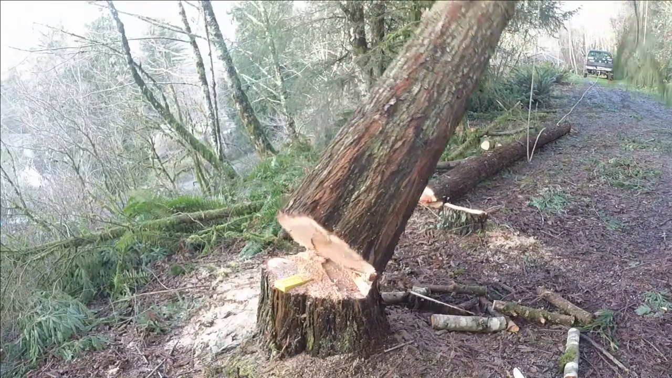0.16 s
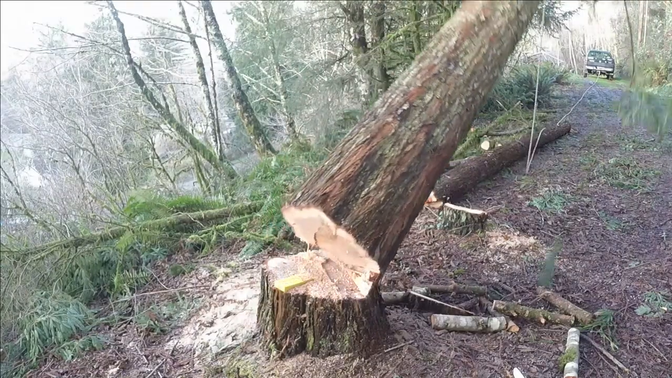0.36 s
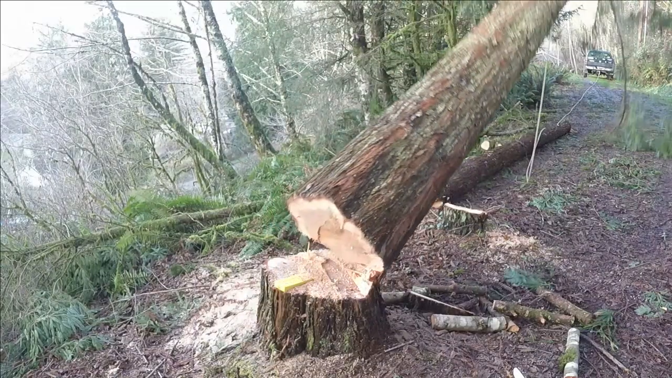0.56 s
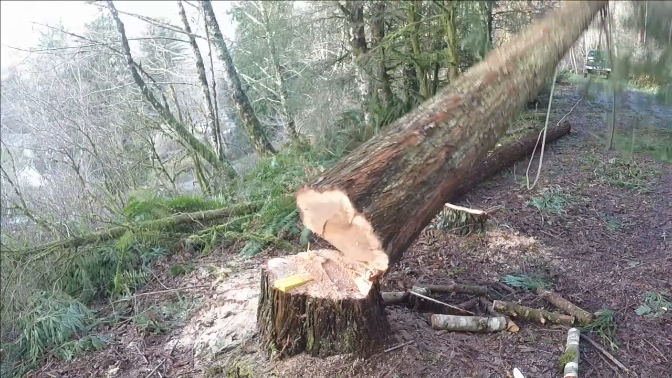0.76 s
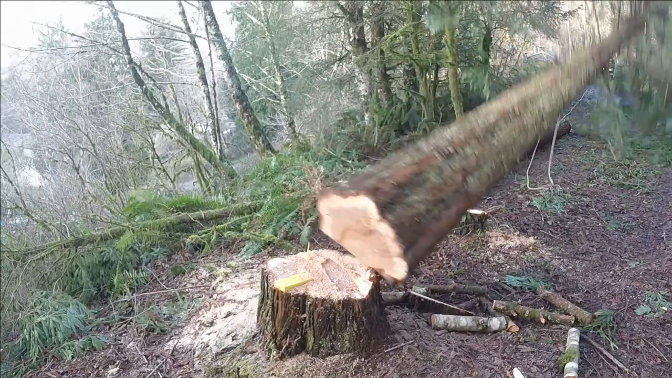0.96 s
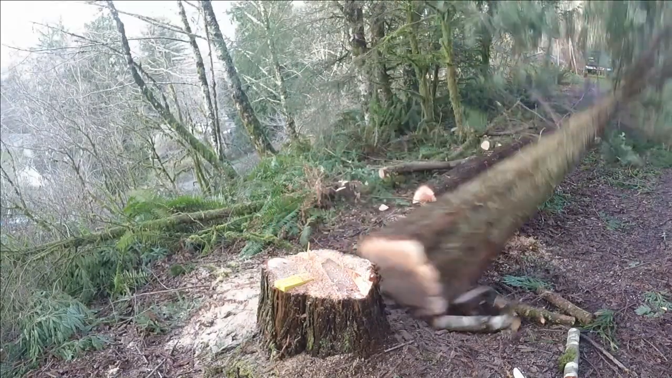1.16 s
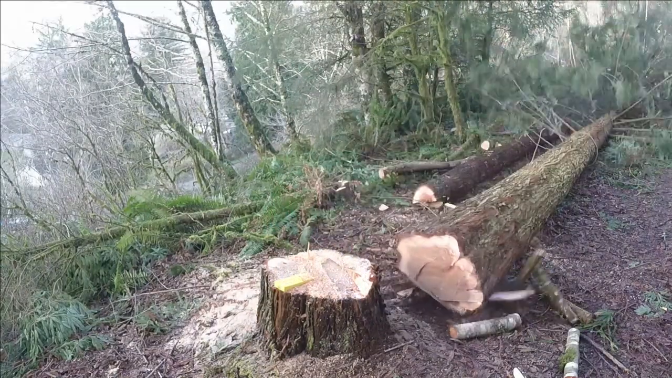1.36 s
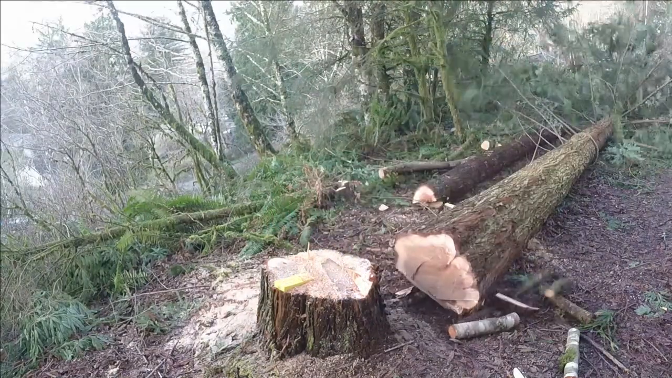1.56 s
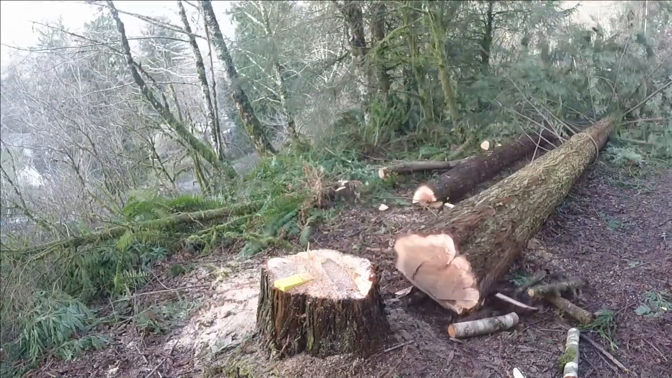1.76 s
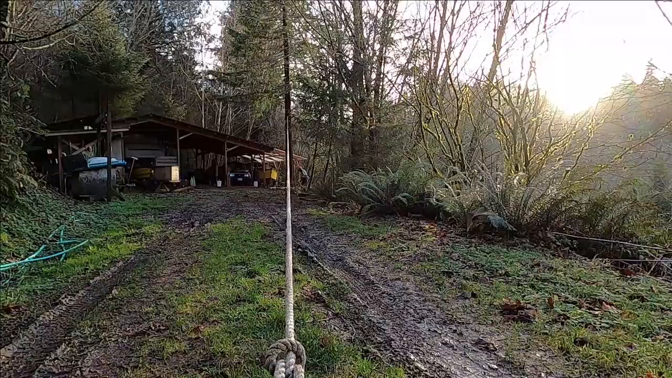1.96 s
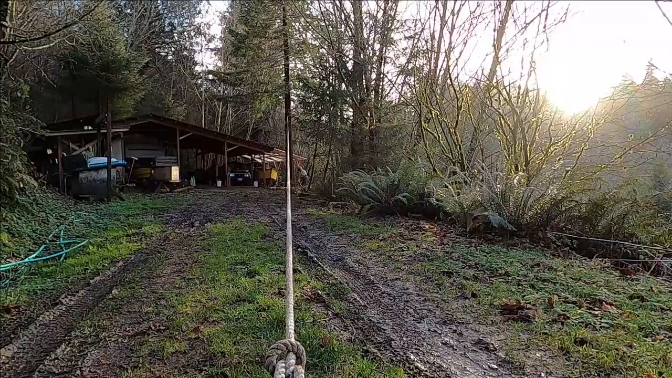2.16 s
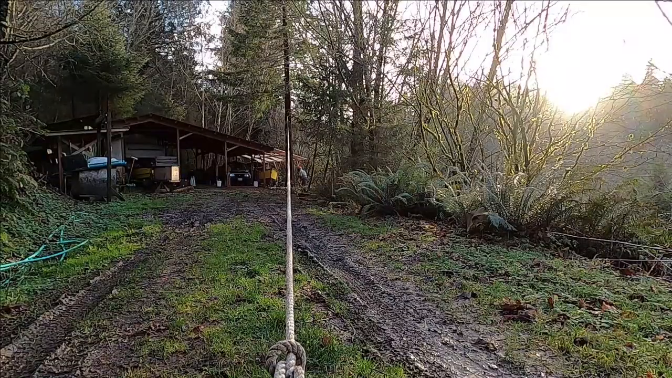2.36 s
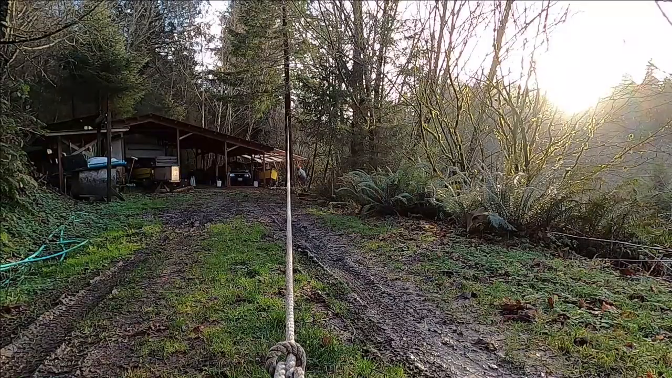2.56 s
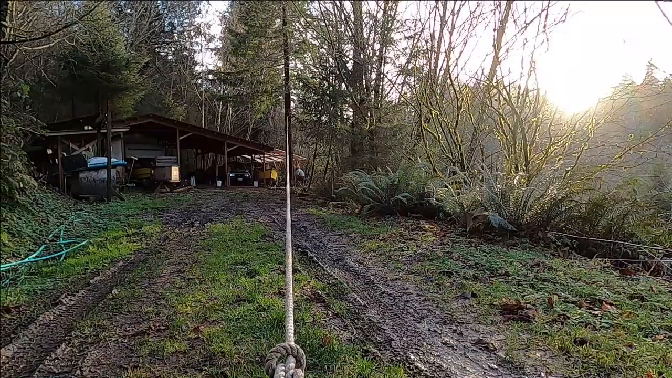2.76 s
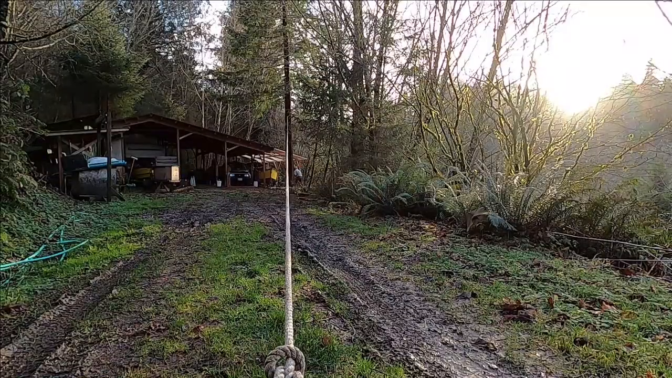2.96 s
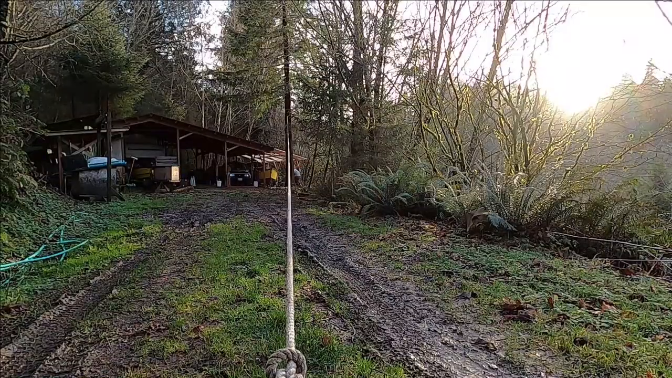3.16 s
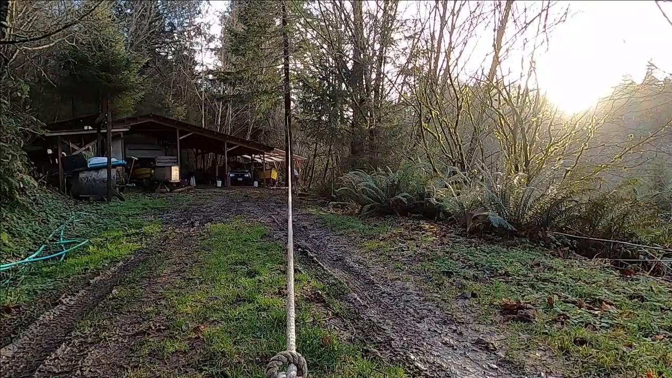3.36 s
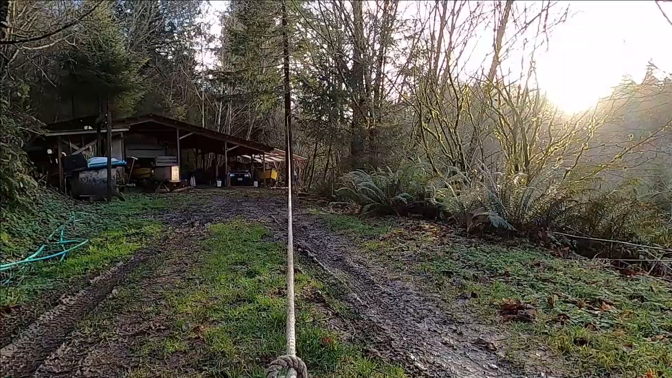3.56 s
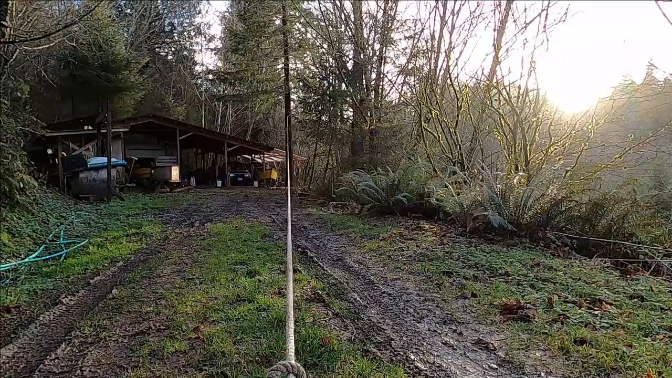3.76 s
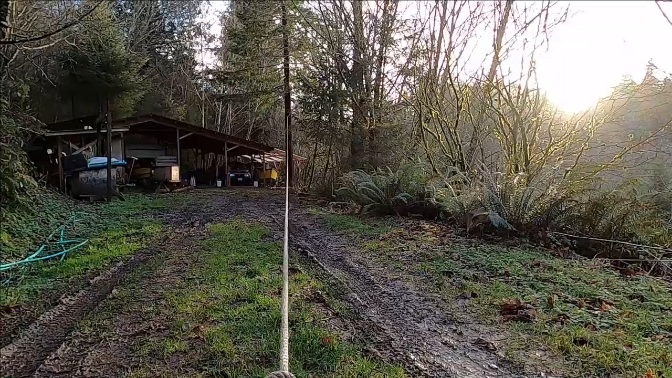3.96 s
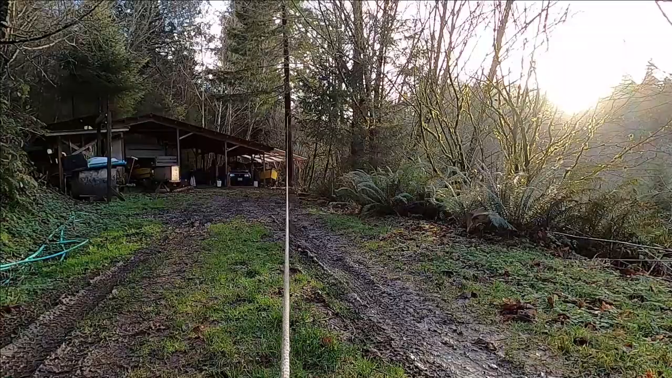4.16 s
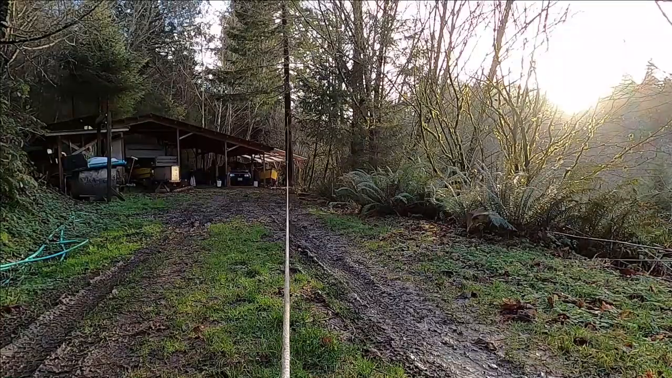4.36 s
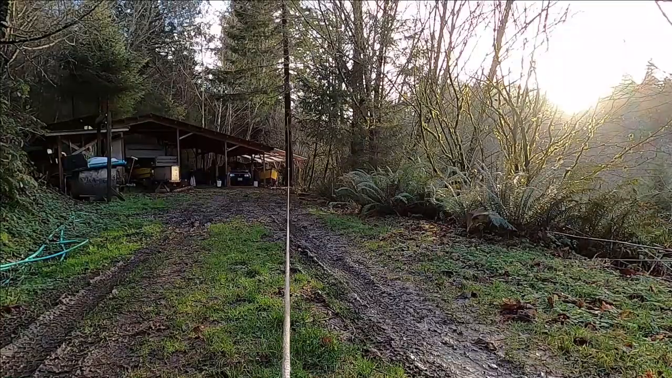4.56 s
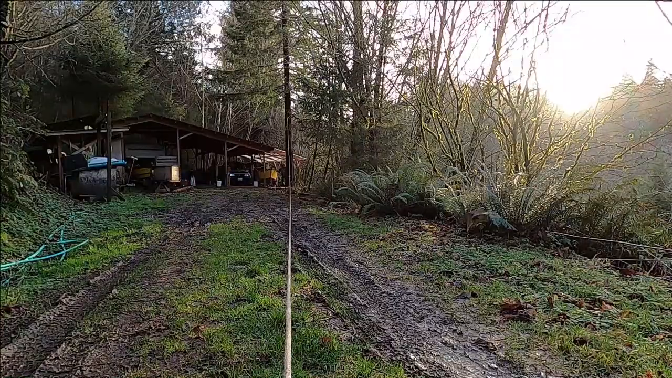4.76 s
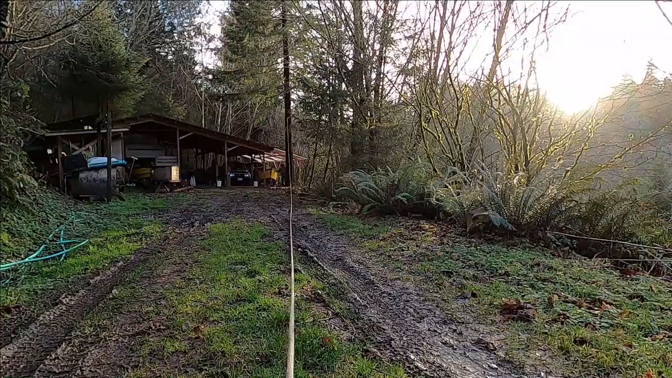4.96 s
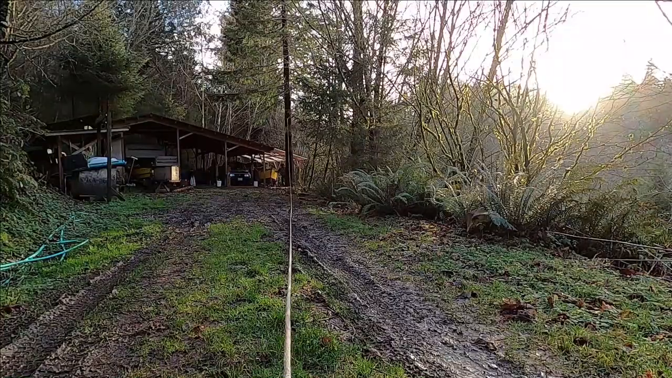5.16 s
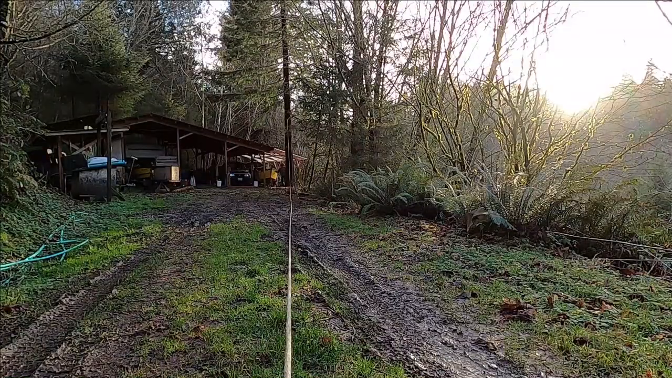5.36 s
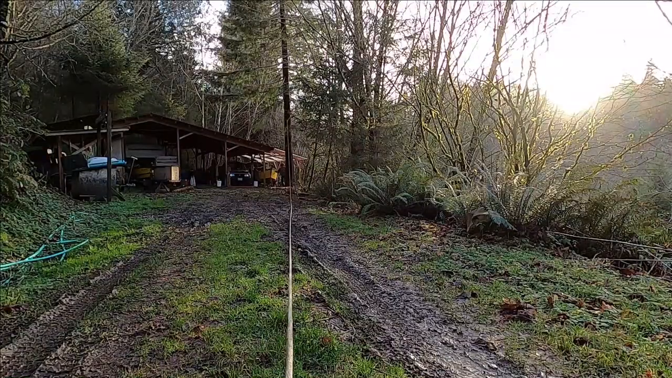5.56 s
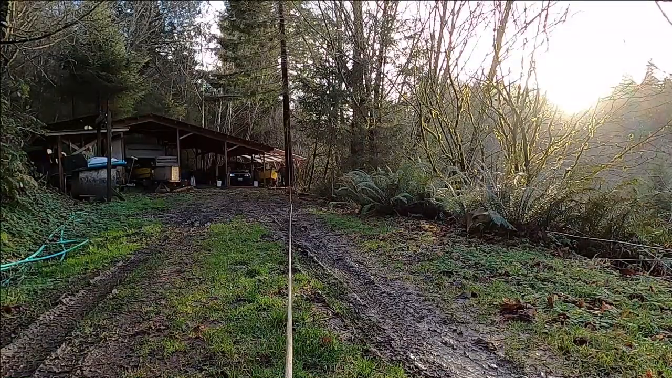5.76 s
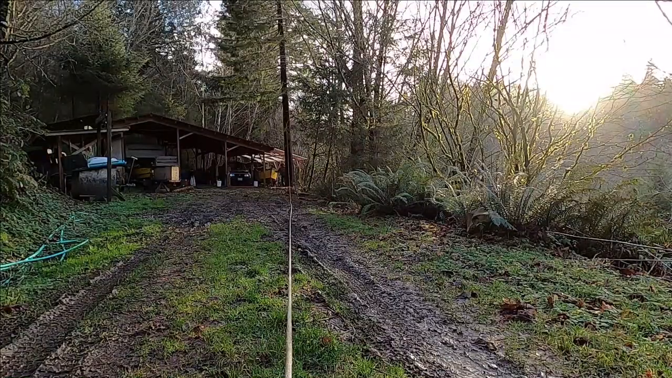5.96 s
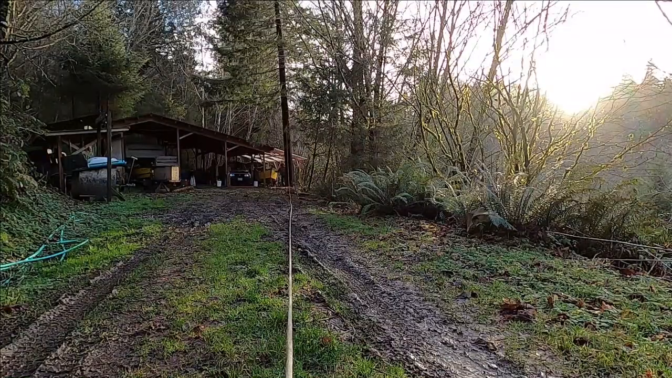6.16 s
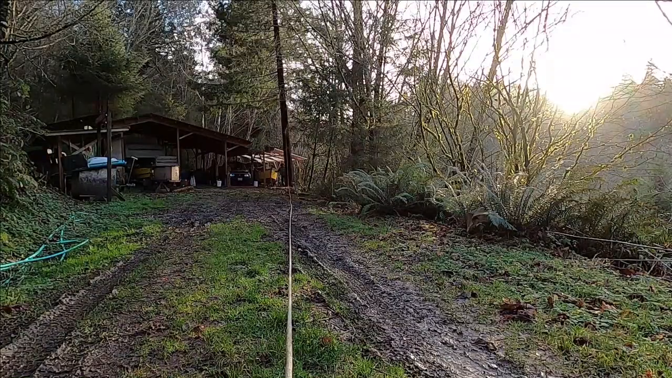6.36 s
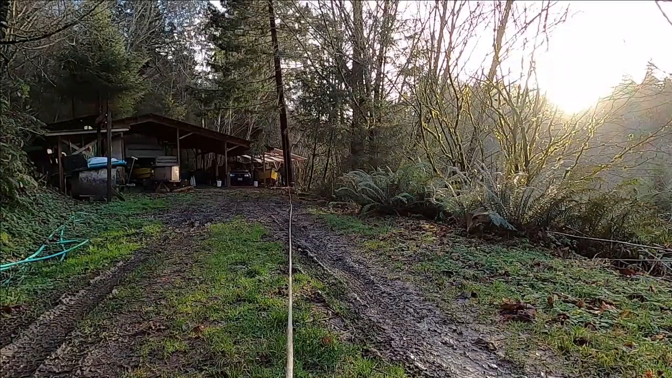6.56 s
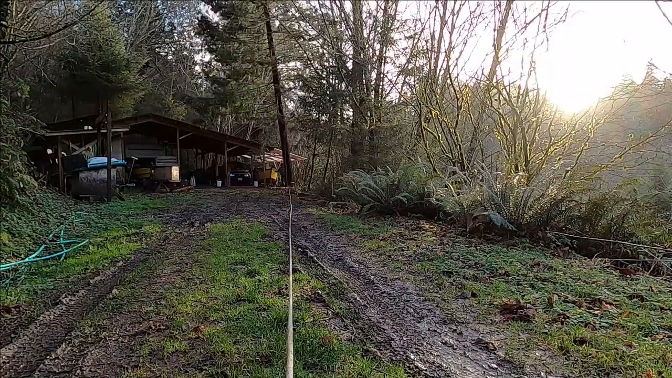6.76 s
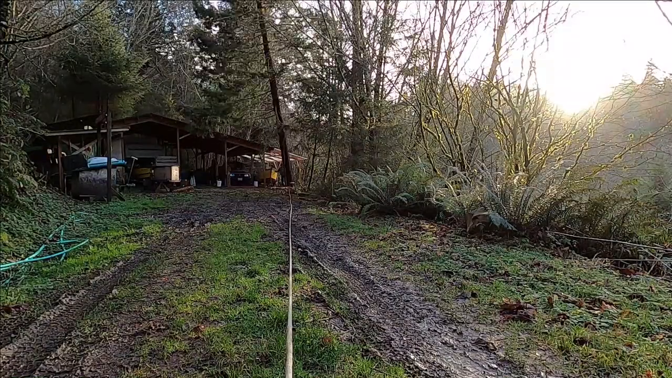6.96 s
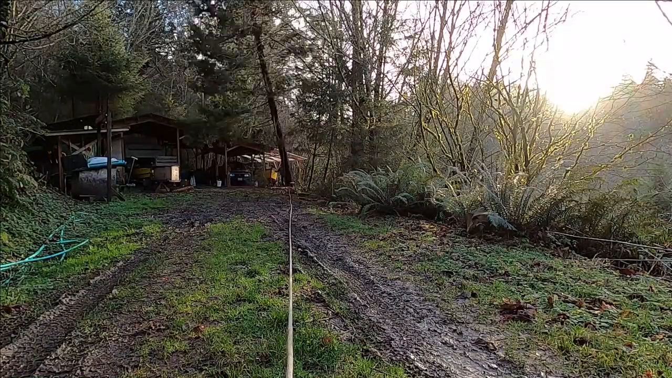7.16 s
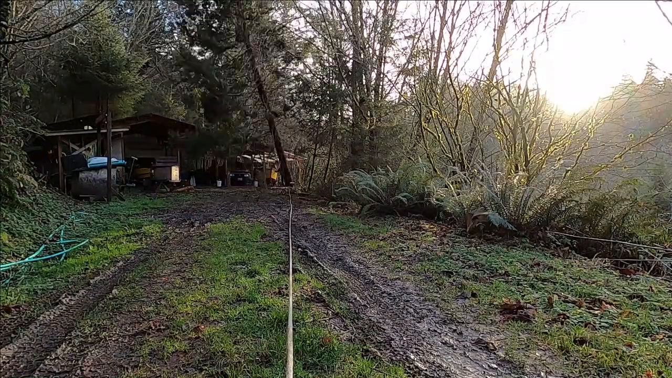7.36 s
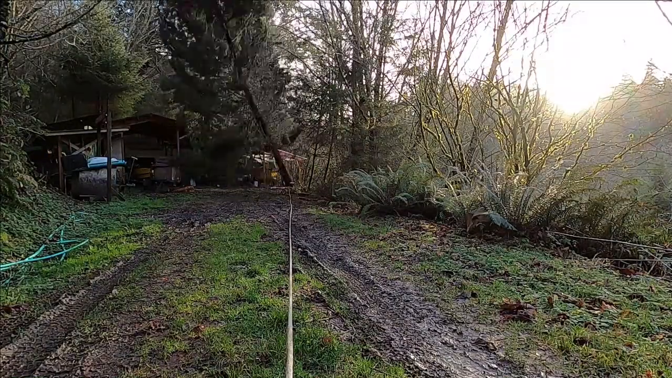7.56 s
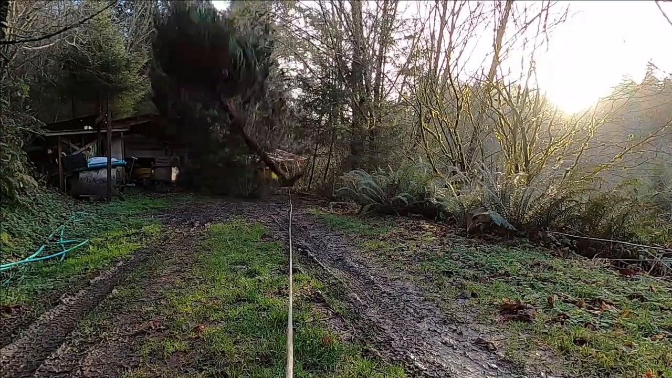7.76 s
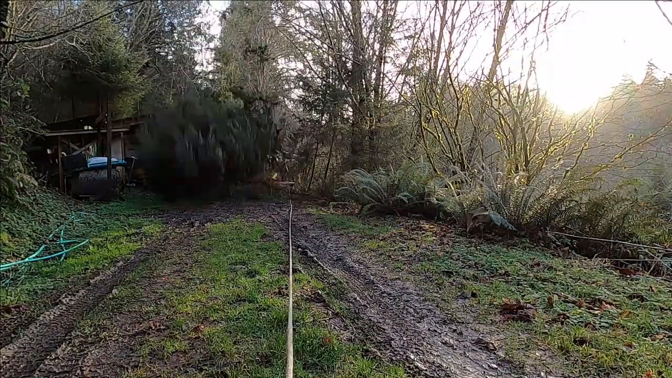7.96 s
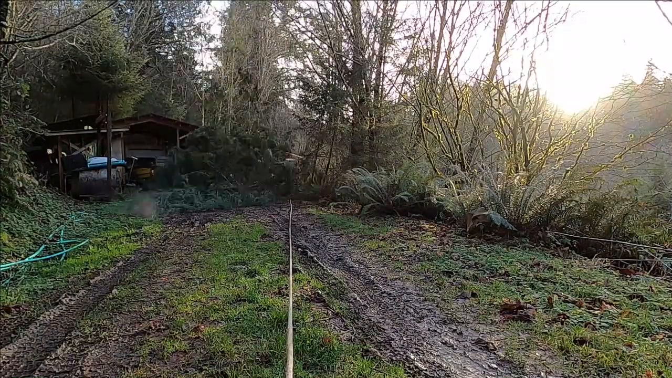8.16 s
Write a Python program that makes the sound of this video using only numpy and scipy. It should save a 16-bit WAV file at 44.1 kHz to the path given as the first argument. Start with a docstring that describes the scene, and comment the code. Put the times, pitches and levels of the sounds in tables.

```python
"""Two trees felled in woodland

Close by, the hinge of a wedged tree tears and snaps and the trunk crashes down: random fibre clicks excite
wood colours and resonances. After an abrupt change of place an engine idles as harmonic lines and a rope pulls
a more distant tree with dull damped bumps. Its hinge cracks ever faster in short avalanches and creaks by
stick-slip, and the crown sweeps through branches to the ground as swelling coloured clicks and noise."""
import sys
import numpy as np
from scipy import signal
from scipy.fft import rfft, irfft
from scipy.io import wavfile
from scipy.ndimage import uniform_filter1d, minimum_filter1d

SR = 44100
rng = np.random.default_rng(int(sys.argv[2]) if len(sys.argv) > 2 else 0)


def wrap_up_sound(samples):
    """Save the sound to the file named by the first command line argument, as 16-bit audio."""
    columns = np.atleast_2d(samples).T
    # keep every value between -1 and 1, then stretch to whole-number steps
    tamed = np.clip(columns, -1, 1)
    steps = np.round(tamed * 32767).astype(np.int16)
    wavfile.write(sys.argv[1], SR, steps)


N = 362061
T = np.arange(N) / SR
# levels in the tables are relative: later stages scale them


def amp(db):
    """Decibels are a logarithmic measure: convert them to linear gain."""
    return 10 ** (np.asarray(db) / 20)


def unit(x):
    """Normalise the mean power, so that the rms is 1."""
    return x / np.sqrt(np.mean(x ** 2) + 1e-20)


def curves(rows):
    """Linear interpolation: each column of a table of (time_s, ..) as a value per sample."""
    times, *columns = np.transpose(rows)
    return [np.interp(T, times, column) for column in columns]


def colour(x, points):
    """Minimum-phase filtering: a causal response with the spectrum (frequency_hz, level_db)."""
    size = 4096
    hz, db = np.transpose(points)
    bin_hz = np.arange(size // 2 + 1) * SR / size
    log_gain = np.log(amp(np.interp(np.log(bin_hz + 1), np.log(hz), db)))
    # folding the cepstrum onto positive times makes the response causal
    cepstrum = irfft(log_gain)[:size // 2]
    cepstrum[1:] *= 2
    response = irfft(np.exp(rfft(cepstrum, size)))
    return signal.fftconvolve(x, response)[:len(x)]


def ring(x, modes):
    """Modal superposition: sum of resonances (frequency_hz, width_hz, level_db)."""
    out = 0
    for hz, width, db in modes:
        b, a = signal.iirpeak(hz, hz / width, fs=SR)
        out = out + amp(db) * signal.lfilter(b, a, x)
    return out


def add(track, s, sound):
    """Superposition: lay a sound into a track at time s."""
    i = max(int(s * SR), 0)
    track[i:i + len(sound)] += sound[:N - i]


def walk(rate):
    """Smoothed random steps, rate per second: a wander with rms 1."""
    k = int(SR / rate)
    steps = np.repeat(rng.standard_normal(N // k + 1), k)
    return unit(uniform_filter1d(steps, k)[:N])


def swell(s, rise, fall_db_per_s):
    """Exponential growth to 1 at time s, then exponential decay."""
    return np.exp(np.minimum(T - s, 0) / rise) * amp(-fall_db_per_s * np.maximum(T - s, 0))


def swells(rows):
    """Power addition of the swells (peak_s, rise_s, fall_db_per_s, level_db, ..): one envelope per level."""
    return np.sqrt(sum(np.outer(amp(dbs), swell(s, rise, fall)) ** 2 for s, rise, fall, *dbs in rows))


def fibres(rate, spread_db, count=N):
    """Random fracture: clicks of breaking fibres, many small and a few large."""
    chance = rng.random(count)
    sign = rng.choice([-1, 1], count)
    size = rng.exponential(size=count)
    return (chance < rate / SR) * sign * amp(spread_db * np.minimum(size, 4))


def fracture(length, rate, spread_db, count=12000):
    """Avalanche: one fibre gives way and sets off a dying run of others."""
    clicks = unit(fibres(rate, spread_db, count=count))
    clicks[0] += 3
    return clicks * np.exp(-np.arange(count) / SR / length)


def burst_level(x, db, length):
    """Energy scaling: a burst gets the energy of a steady sound of level db lasting its length."""
    return x * amp(db) * np.sqrt(length * SR / np.sum(x ** 2))


def knocks(rows, rise):
    """Damped oscillation (start_s, level_db, pitch_hz, decay_s) that builds up over rise cycles."""
    out, t = np.zeros(N), T[:SR]
    for s, db, hz, decay in rows:
        swing = np.sin(2 * np.pi * hz * t) * np.exp(-t / decay)
        add(out, s, amp(db) * swing * (1 - np.exp(-t * hz / rise)))
    return out


def woods(x, t60, dull_hz, early_db, early_s):
    """Diffuse scattering from the ground and brush nearby, then from ever more distant trunks."""
    t = T[:SR]
    far, near = rng.standard_normal((2, SR))
    late = far * amp(-60 * t / t60) * (1 - np.exp(-t / 0.0086))
    early = near * np.exp(-t / early_s)
    b, a = signal.butter(1, dull_hz, fs=SR)
    echoes = signal.lfilter(b, a, unit(late) + amp(early_db) * unit(early))
    # echoes return in ragged clumps
    return signal.fftconvolve(x, echoes)[:N] / np.sqrt(SR) * amp(2.5 * walk(300) - 1)


HINGE_PARTS_S, HINGE_RELEASE_DB_PER_S = 1, 200


def hinge_hold():
    """Release of tension: steady tearing until the hinge parts, then the loose fibres fall quiet."""
    return amp(-HINGE_RELEASE_DB_PER_S * np.maximum(T - HINGE_PARTS_S, 0))


# a bundle of fibres goes at once: peak_s, rise_s, fall_db_per_s, wood_body_db, fibres_db
HINGE_RIPS = [(0.026, 0.065, 200, -15.5, -21.5), (0.1, .015, 119, -28, -25.5), (0.37, 0.018, 120, -24, -31),
              (0.446, 0.011, 67, -16.5, -22.5), (0.65, 0.049, 48, -22, -30), (0.94, 0.058, 46, -23, -27.5)]
# the butt breaks free, trunk and limbs hit the ground, debris settles:
# peak_s, rise_s, fall_db_per_s, wood_body_db, splinters_db
GROUND_CRASHES = [(1.0, 0.0054, 192, -19, -15), (1.17, 0.044, 90, -17, -16.5),
                  (1.23, 0.038, 198, -27, -12.5), (1.29, .02, 73, -19, -43),
                  (1.35, 0.08, 102, -16.5, -13.5), (1.39, 0.019, 176, -15, -17.5), (1.5, .1, 5, -45, -40.5),
                  (1.698, 0.0087, 115, -34, -47)]
# spectrum of the ringing wood: frequency_hz, density_db (per Hz)
BODY_SPECTRUM = [(30, -16), (100, -4.5), (180, 0.5), (270, -0.5), (450, -0.5), (620, -1), (830, 1),
                 (1050, -0.5), (1300, -18), (1700, -37), (4000, -49)]


def wood_body():
    """Forced vibration: tearing fibres and the crash ring the body of the wood."""
    rips, crashes = swells(HINGE_RIPS)[0], swells(GROUND_CRASHES)[0]
    steady = amp(-29) * hinge_hold()
    level = np.hypot(np.hypot(steady, rips), crashes)
    body = unit(colour(fibres(1100, 3.5), BODY_SPECTRUM))
    return body * level * amp(-4.5 + 0.9 * walk(45.04))


# spectrum of tearing hinge fibres: frequency_hz, density_db (per Hz)
TEARING_SPECTRUM = [(300, -29), (1100, 1), (1550, 0), (2100, 0.5), (3300, -1), (4200, -5), (5600, -2),
                    (7000, -6), (8500, -12.5), (11000, -19), (15000, -35)]
# spectrum of splintering wood: frequency_hz, density_db (per Hz)
SPLINTER_SPECTRUM = [(300, -25.5), (1100, -1.5), (1550, -4), (2100, 2), (2700, -1), (3500, 0), (4300, -5),
                     (5400, -2), (7000, -11), (8500, -15.5), (11000, -25.5), (15000, -43)]


def tearing_and_splinters():
    """Shot noise: hinge fibres hiss until the hinge parts, after that limbs splinter on the ground."""
    rips, crashes = swells(HINGE_RIPS)[1], swells(GROUND_CRASHES)[1]
    tearing = unit(colour(fibres(6000, 1.9), TEARING_SPECTRUM))
    splinters = unit(colour(fibres(6000, 2.7), SPLINTER_SPECTRUM))
    both = tearing * np.hypot(amp(-30.5) * hinge_hold(), rips) + splinters * crashes
    return both * amp(-4.5 + 1.6 * walk(60.3))


# big breaks and knocks of the near tree: start_s, splinters_db, hinge_ring_db, trunk_thud_db, length_s
BIG_BREAKS = [(0.002, -21.5, -34, -29, 0.023), (0.017, -36, -30, -11.5, 0.0025),
              (0.029, -22.5, -28.5, -45, 0.092), (0.086, -28, -13, -40, 0.012),
              (0.236, -34, -23.5, -44, 0.0057), (0.27, -31, -37, -29, 0.049),
              (0.44, -21, -11, -12.5, 0.0029), (0.447, -23, -15, -33, 0.015), (0.476, -30, -38, -37, 0.02),
              (0.628, -30, -25, -29, 0.025), (0.941, -31, -38, -25, 0.011),
              (0.986, -13, -16.5, -10.5, 0.013), (1.017, -17.5, -19.5, -25, 0.011),
              (1.082, -14, -19, -19.5, 0.023), (1.113, -17.5, -22.5, -35, 0.0049),
              (1.156, -23, -31, -15, 0.036), (1.187, -18.5, -18, -16.5, 0.037),
              (1.229, -19, -44, -21, 0.011), (1.335, -46, -17.5, -17.5, 0.038),
              (1.381, -19.5, -41, -38, 0.0062), (1.690, -56, -42, -56, 0.0085),
              (1.786, -37, -49, -54, 0.041)]
# resonances of the hinge wood: frequency_hz, width_hz, level_db
HINGE_RESONANCES = [(690, 130, 5), (875, 200, 10), (1016, 130, 7.5), (1130, 83, -25), (3100, 100, -17.5)]
# resonances of the trunk: frequency_hz, width_hz, level_db
TRUNK_RESONANCES = [(182, 43, -2), (269, 31, 1), (337, 92, -11), (438, 320, -1.5)]


def big_breaks():
    """Impulse excitation: each avalanche throws splinters, rings the hinge and shakes the trunk."""
    out = np.zeros(N)
    for s, crack_db, ring_db, thud_db, length in BIG_BREAKS:
        avalanche = fracture(length, 9000, 1.0)
        splinters = colour(avalanche, SPLINTER_SPECTRUM)
        # a broad second resonance rounds off the modes
        hinge_ring = ring(ring(avalanche, HINGE_RESONANCES), [(970, 980, 0)])
        trunk_thud = ring(ring(avalanche, TRUNK_RESONANCES), [(302, 550, 0)])
        add(out, s, burst_level(splinters, crack_db, length))
        add(out, s, burst_level(hinge_ring, ring_db, length))
        add(out, s, burst_level(trunk_thud, thud_db, length))
    return out


# stiff slivers of the hinge twang as they part: start_s, level_db, pitch_hz, decay_s
SLIVER_TWANGS = [(0.085, -14, 1070, 0.006), (0.234, -18, 934, .008), (0.4402, -9.5, 3420, 0.0019),
                 (0.447, -5, 1000, 0.012)]


def twangs():
    """Free vibration: released slivers swing at their own pitch."""
    return knocks(SLIVER_TWANGS, rise=0.77)


# the shaken ground rocks the microphone: time_s, level_db
SWAY_LEVEL = [(0, -61), (1.1, -50), (1.25, -42), (1.5, -40.5), (1.87, -42.5)]


def ground_sway():
    """Narrow-band random vibration: noise through low resonances."""
    noise = ring(rng.standard_normal(N), [(21.3, 9.2, 0)])
    return unit(ring(noise, [(21.9, 66, 0)])) * amp(curves(SWAY_LEVEL)[0])


def near_tree():
    """Direct and scattered sound: the near tree, with echoes of its breaks and twangs."""
    breaks = big_breaks() + twangs()
    echoes = amp(-8.0) * woods(breaks, t60=1.0, dull_hz=7000, early_db=-8.0, early_s=0.019)
    return wood_body() + tearing_and_splinters() + breaks + echoes + ground_sway()


# level of the idling engine: time_s, level_db
IDLE_LEVEL = [(1.88, -43), (2.6, -41), (3.3, -40.5), (4.0, -41.5), (4.8, -44), (6.0, -48), (8.2, -42)]
# lines of the engine: multiple_of_cycle_rate, level_db
ENGINE_LINES = [(6, -15), (8, -6.5), (12, -1.5), (13, 2), (14, -13), (15, -8.5), (17, -7), (19, -29.5),
                (21, -43.5), (23, -32)]
# spectrum of the engine's noise: frequency_hz, density_db (per Hz)
RUMBLE_SPECTRUM = [(20, -36), (45, -5), (80, -4), (170, 1), (260, -1.5), (400, -8), (600, -33), (2000, -50),
                   (12000, -100)]
CYCLE_HZ = 12.5


def engine(scatter=0.73, waver_db=1.6, rumble_db=-12):
    """Harmonic series of uneven firings: neighbouring exhaust lines beat once per engine cycle."""
    cycles = CYCLE_HZ * T + 0.006 * walk(2.25)
    lines = np.zeros(N)
    for order, db in ENGINE_LINES:
        phase = scatter * rng.standard_normal()
        lines += amp(db + waver_db * walk(6.1)) * np.cos(2 * np.pi * order * cycles + phase)
    rumble = unit(colour(rng.standard_normal(N), RUMBLE_SPECTRUM))
    return (unit(lines) + amp(rumble_db) * rumble) * amp(curves(IDLE_LEVEL)[0])


# spectrum of the woodland hiss: frequency_hz, density_db (per Hz)
AIR_SPECTRUM = [(150, -13), (300, -7.5), (450, -15.5), (650, -22), (800, -20), (1000, -10), (1500, -13),
                (2000, -17), (3200, -20.5), (5900, -31), (9000, -41), (14000, -86)]


def air():
    """Broadband random noise: soft woodland hiss."""
    return unit(colour(rng.standard_normal(N), AIR_SPECTRUM)) * amp(-49.5 + 0.11 * walk(3.1))


# cracks of hinge and branches of the far tree: start_s, level_db, pitch_hz
FAR_CRACKS = [(1.961, -47.5, 2960), (2.460, -46.5, 3300), (2.644, -39, 3170), (2.701, -42, 3000),
              (3.137, -35, 3220), (3.273, -47.5, 3000), (3.39, -32.5, 2870), (3.397, -27.5, 2550),
              (3.409, -35.5, 2550), (3.527, -42.5, 3300), (3.842, -43.5, 3150), (3.937, -27.5, 2010),
              (3.948, -37, 2050), (4.105, -35, 2340), (4.255, -40.5, 3030), (4.44, -44.5, 3500),
              (4.565, -41, 3060), (4.681, -36.5, 2260), (4.99, -41, 2200), (5.228, -36.5, 2200),
              (5.272, -31, 1860), (5.279, -28.5, 2630), (5.398, -30.5, 2200), (5.433, -28.5, 2170),
              (5.473, -23.5, 1450), (5.497, -28, 4050), (5.64, -31, 1410), (5.875, -15, 2400),
              (6.023, -17, 2420), (6.028, -16, 2600), (6.179, -18, 3100), (6.221, -16.5, 3100),
              (6.289, -22, 3400), (6.36, -26.5, 3440), (6.434, -22, 3960), (6.446, -16.5, 2090),
              (6.813, -14.5, 2860), (6.83, -17, 1900), (6.893, -18, 2720), (6.948, -19, 2080),
              (7.09, -18.5, 4600), (7.137, -19, 4990), (7.154, -19.5, 4600), (7.223, -25, 2130),
              (7.304, -17.5, 2600), (7.310, -19.5, 1297), (7.437, -19, 2590), (7.487, -25, 2500),
              (7.736, -19, 5540), (7.865, -17, 1280), (8.005, -23.5, 1500), (8.016, -18.5, 2780),
              (8.037, -17, 2170), (8.142, -16.5, 1400), (8.192, -13, 1200)]
# common colour of the cracks: frequency_hz, gain_db
CRACK_SPECTRUM = [(100, -43), (400, 19.5), (650, 2), (1000, 7.5), (2500, 4.5), (4000, 6.5), (7000, 2.5),
                  (9000, -3), (15000, -21.5)]
CRACK_DECAY_S, CRACK_RISE_S = 0.0035, 0.00074


def far_cracks(breadth=0.93):
    """Fracture avalanche: each crack is coloured by the size of the piece that breaks."""
    out = np.zeros(N)
    for s, db, hz in FAR_CRACKS:
        avalanche = fracture(CRACK_DECAY_S, 8000, 3.8, count=4000)
        building = 1 - .5 * np.exp(-T[:len(avalanche)] / CRACK_RISE_S)
        crack = ring(avalanche * building, [(hz, hz * breadth, 0)])
        add(out, s, burst_level(colour(crack, CRACK_SPECTRUM), db, CRACK_DECAY_S))
    return out


# level of the shudder that follows the bumps of the rope: time_s, level_db
SHUDDER_LEVEL = [(4.07, -56), (4.11, -41), (4.2, -46), (4.3, -49), (4.315, -20), (4.4, -33), (4.47, -41.5),
                 (4.7, -50), (5.0, -64)]
# spectrum of the shudder: frequency_hz, density_db (per Hz)
SHUDDER_SPECTRUM = [(20, -8), (45, -7.5), (100, 3.5), (220, -4.5), (290, -18), (420, -16), (600, -35),
                    (1500, -69), (12000, -120)]


def shudder():
    """Low-frequency random vibration under a level curve."""
    return unit(colour(rng.standard_normal(N), SHUDDER_SPECTRUM)) * amp(curves(SHUDDER_LEVEL)[0])


# dull bumps as the rope takes the load: start_s, level_db, pitch_hz, decay_s
ROPE_BUMPS = [(4.095, -29, 41.8, 0.34), (4.105, -27.5, 134, .04), (4.313, -5, 94.6, 0.027),
              (4.314, -18.5, 190.6, 0.034), (4.335, -26, 48, 0.12), (4.366, -17, 147, 0.032),
              (4.380, -15.5, 91, 0.031), (4.45, -28, 86.4, 0.076), (4.63, -32, 87, 0.063)]


def rope_jolt():
    """Damped oscillation: dull bumps and a dying shudder that shakes the two ports unequally."""
    mid, side = shudder(), shudder()
    return knocks(ROPE_BUMPS, rise=0.59) + mid + np.outer([1, -1], side) * amp(-10)


# level of the fine crackle of fibres and twigs: time_s, level_db
CRACKLE_LEVEL = [(4.3, -47), (4.95, -59), (5.5, -50.5), (5.85, -44), (5.9, -40), (6.2, -38.5), (6.7, -34.5),
                 (7.2, -37.5), (7.55, -33), (8.21, -35)]
# boughs strike neighbouring trees and at last the ground:
# peak_s, rise_s, fall_db_per_s, twigs_db, branches_db, boughs_db
BOUGH_THRASHES = [(6.85, 0.013, 40, -53, -49, -40), (7.33, .015, 100, -37, -33.5, -32),
                  (7.54, 0.12, 67, -44, -34, -35.5), (7.92, 0.092, 50, -38, -34, -29),
                  (8.04, 0.027, 29, -24.5, -26, -24), (8.2, 0.013, 40, -40, -20, -23)]
# spectrum of twigs: frequency_hz, density_db (per Hz)
TWIG_SPECTRUM = [(900, -25.5), (1800, -8.5), (2300, 3), (3100, -1.5), (3800, 3), (4900, -0.5), (7000, -4.5),
                 (8200, -8), (12000, -22), (15000, -32)]
# spectrum of crunching branches: frequency_hz, density_db (per Hz)
BRANCH_SPECTRUM = [(450, -21), (650, -12.5), (900, -0.5), (1100, -2.5), (1300, 3.5), (1750, -10.5),
                   (2100, -4), (3000, -11), (12000, -63)]
# spectrum of heavy boughs: frequency_hz, density_db (per Hz)
BOUGH_SPECTRUM = [(30, -37), (70, -18), (120, -9), (190, 2.5), (340, -2), (470, -5), (640, -19.5),
                  (900, -17), (2000, -46), (12000, -95)]
LANDS_S = 8.17
BRANCH_DB, BRANCH_DB_PER_S = -33.5, 4.5
BOUGH_DB, BOUGH_DB_PER_S = -36.5, 4


def crown():
    """Shot noise by size: twigs crackle over a wash of needles, branches crunch, heavy boughs thrash."""
    twig_hits, branch_hits, bough_hits = swells(BOUGH_THRASHES)
    # the lean grows exponentially, so branches and boughs gain a steady number of dB per second
    to_go = np.maximum(LANDS_S - T, 0)
    twig_level = np.hypot(amp(curves(CRACKLE_LEVEL)[0]), twig_hits)
    branch_level = np.hypot(amp(BRANCH_DB - BRANCH_DB_PER_S * to_go), branch_hits)
    bough_level = np.hypot(amp(BOUGH_DB - BOUGH_DB_PER_S * to_go), bough_hits)
    # a whole twig goes in a tiny avalanche of its own
    snaps = signal.fftconvolve(fibres(110, 3.5), fracture(.0015, 8000, 2, count=600))[:N]
    needles = rng.standard_normal(N)
    crackle = amp(-3.5) * unit(snaps) + amp(-3) * unit(fibres(900, 4)) + amp(-3) * needles
    twigs = unit(colour(crackle, TWIG_SPECTRUM)) * twig_level * amp(2.54 * walk(45))
    branches = unit(colour(fibres(1200, 2.1), BRANCH_SPECTRUM)) * branch_level * amp(2.4 * walk(35))
    boughs = unit(colour(fibres(1500, 2.8), BOUGH_SPECTRUM)) * bough_level * amp(2.2 * walk(20))
    # the twigs stir first, the heavier wood once the tree tips
    stirring = np.interp(T, [4.3, 5.0], [0, 1])
    tipping = np.interp(T, [4.8, 5.9], [0, 1])
    return stirring * twigs + tipping * (branches + boughs)


# stick-slip of the bending hinge: time_s, slip_rate_hz, ticks_db
HINGE_CREAK = [(5.48, 49, -42), (5.56, 46, -62), (5.75, 73, -54), (5.86, 88, -42), (6.2, 110, -60),
               (6.5, 150, -52), (6.7, 470, -55), (7.45, 270, -70)]


def creak():
    """Stick-slip friction: the hinge gives single ticks at a rate set by the table."""
    hz, tick_db = curves(HINGE_CREAK)
    # the faster it slips, the less even the slips are
    jitter = np.interp(hz, [80, 300], [.03, .09])
    cycles = np.cumsum(hz * (1 + jitter * walk(200))) / SR
    ticks = np.diff(np.floor(cycles), prepend=0)
    slips = ticks * np.sqrt(SR / hz) * amp(1.6 * walk(120))
    return unit(colour(slips, TWIG_SPECTRUM)) * amp(tick_db) * (T > HINGE_CREAK[0][0])


# branches that snap with one clear pitch: start_s, level_db, pitch_hz, decay_s
BRANCH_SNAPS = [(6.317, -12.5, 1300, 0.0036), (7.063, -22.5, 1020, 0.0052), (7.865, -11, 1066, 0.0026),
                (7.9612, 11, 4050, 0.00081), (8.160, -8, 1130, 0.0022)]


def branch_snaps():
    """Damped free vibration: a snapped branch swings at one pitch."""
    return knocks(BRANCH_SNAPS, rise=0.71)


# groans of the hinge: start_s, length_s, first_pitch_hz, last_pitch_hz, level_db
HINGE_GROANS = [(6.513, 0.21, 190, 564, -41), (6.82, .18, 273.8, 197, -38), (6.839, .16, 457.6, 341, -40.5),
                (7.292, 0.091, 290, 181, -31.5)]


def groans(jitter=0.045):
    """Stick-slip at audio rate: fast slips merge into rough gliding tones that swell and fade."""
    out = np.zeros(N)
    for s, length, first_hz, last_hz, db in HINGE_GROANS:
        part = np.clip((T - s) / length, 0, 1)
        glide_hz = first_hz + (last_hz - first_hz) * part
        cycles = np.cumsum(glide_hz * (1 + jitter * walk(200))) / SR
        tone = unit(np.sin(2 * np.pi * cycles) + amp(-21) * np.sin(4 * np.pi * cycles))
        out += tone * amp(db) * 2 * np.sqrt(part * (1 - part))
    return out * amp(-2 + 3.5 * walk(110))


# level of the far trunk coming down on the ground: time_s, level_db
LANDING_LEVEL = [(7.0, -70), (7.3, -51), (7.7, -50), (7.9, -40), (8.03, -33), (8.21, -31)]
# spectrum of the ground under the far tree: frequency_hz, density_db (per Hz)
GROUND_SPECTRUM = [(18, -8), (35, -7), (70, 6), (110, -0.5), (200, 0), (600, -52), (12000, -120)]


def landing():
    """Low-frequency ground vibration: noise rumbles under the weight of the far tree."""
    return unit(colour(rng.standard_normal(N), GROUND_SPECTRUM)) * amp(curves(LANDING_LEVEL)[0])


def limiter(x, top_db, release_db_per_s):
    """Automatic gain reduction: turn down just ahead of a peak and recover steadily."""
    over = np.maximum(20 * np.log10(np.abs(x).max(axis=0) + 1e-9) - top_db, 0)
    recovery = release_db_per_s * T
    gain = amp(recovery - np.maximum.accumulate(over + recovery))
    return x * uniform_filter1d(minimum_filter1d(gain, size=33), size=33)


def surroundings(cracks):
    """Diffuse field: echoes of the cracks, the crown and hiss from all around."""
    echoes = woods(cracks, t60=.55, dull_hz=5000, early_db=0, early_s=.028)
    return amp(-5) * echoes + crown() + air()


# stereo width, what differs between left and right: frequency_hz, side_minus_mid_db
SIDE_SPECTRUM = [(50, -15), (300, -25), (650, -5.5), (1400, -10.5), (3000, -4.5), (6500, -1.5),
                 (12000, -13)]
PORT_LAG_S = .000022


def far_tree():
    """Arrival-time difference: the tree reaches the left port a moment later, amid a diffuse field."""
    cracks = far_cracks()
    around, across = surroundings(cracks), surroundings(cracks)
    direct = cracks + branch_snaps() + creak() + groans() + around
    side = colour(across, SIDE_SPECTRUM)
    # a phase proportional to frequency is a pure delay
    bin_hz = np.arange(N // 2 + 1) * SR / N
    late = irfft(rfft(direct) * np.exp(-2j * np.pi * bin_hz * PORT_LAG_S), N)
    # the tree is slightly louder in the left port: gains of +0.6 and -0.6 dB
    ports = np.array([(late + side) * amp(.6), (direct - side) * amp(-.6)])
    mix = ports + engine() + rope_jolt() + landing()
    return limiter(mix, top_db=-4.5, release_db_per_s=208)


CUT_S = 1.878


def scene():
    """Juxtaposition: the near fall, the same in both ears, gives way abruptly to the far one."""
    return np.where(T < CUT_S, near_tree(), far_tree())


TOP_HZ = 15200


def record(dry):
    """Clipping and band limiting: the recorder holds full scale and cuts the top."""
    held = np.clip(dry, -.88, .88)
    low_pass = signal.ellip(8, .2, 70, TOP_HZ, fs=SR, output="sos")
    return signal.sosfilt(low_pass, held)


dry = scene()
out = record(dry)
wrap_up_sound(out)
```